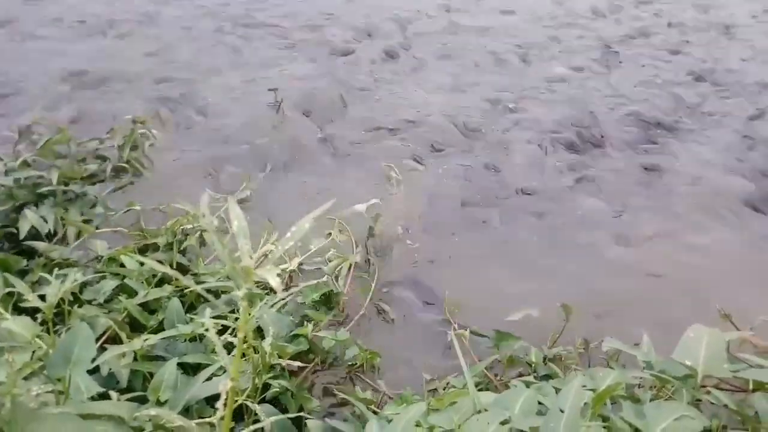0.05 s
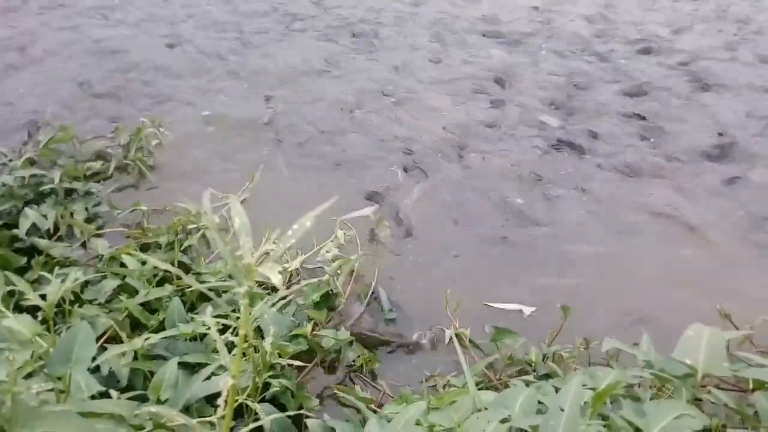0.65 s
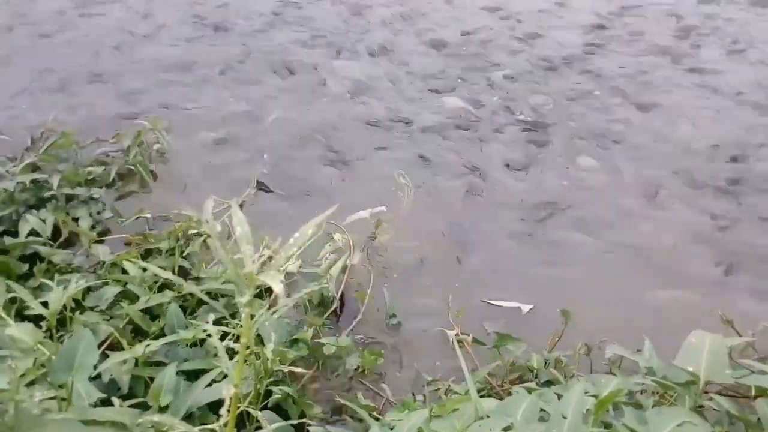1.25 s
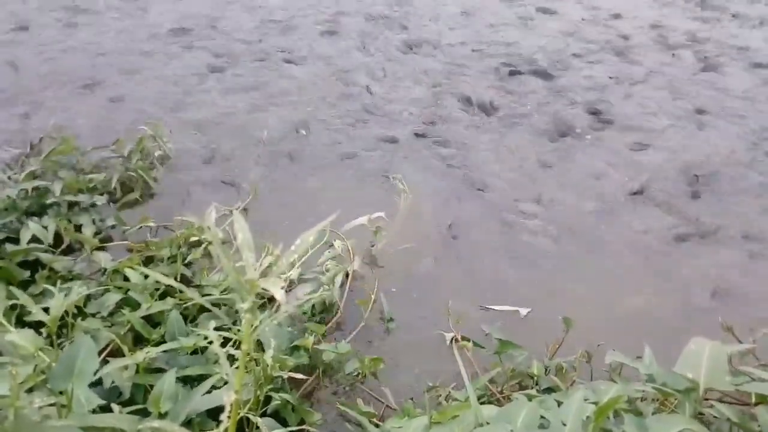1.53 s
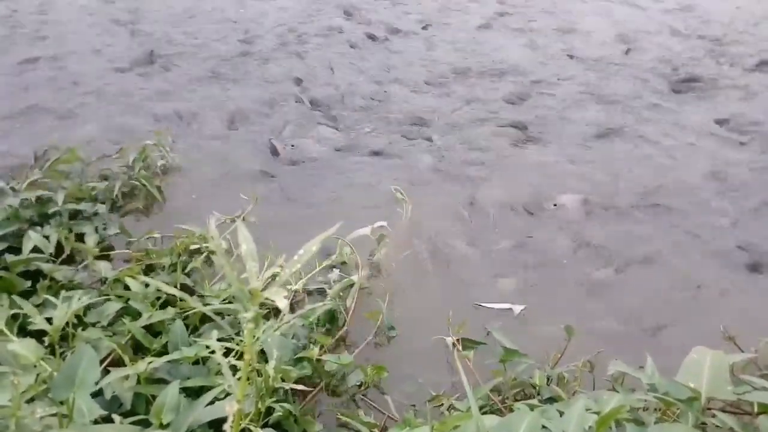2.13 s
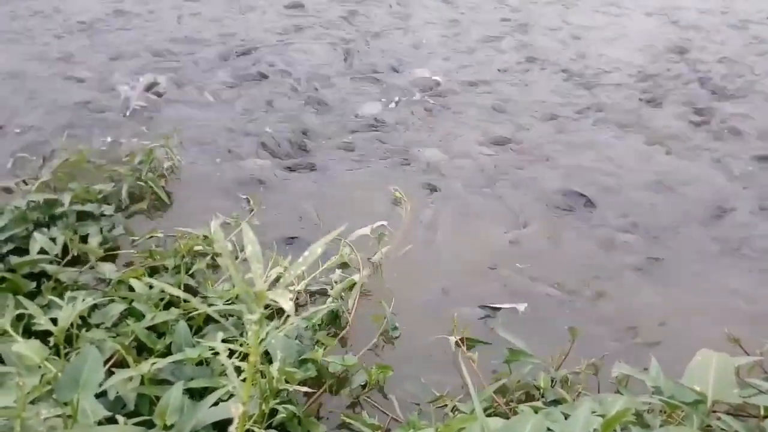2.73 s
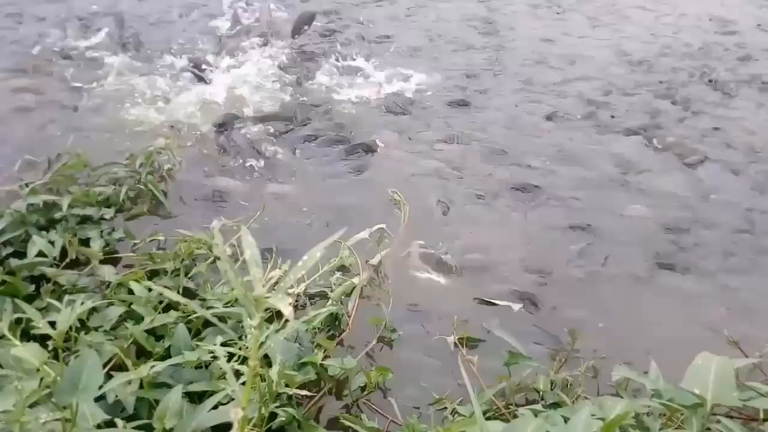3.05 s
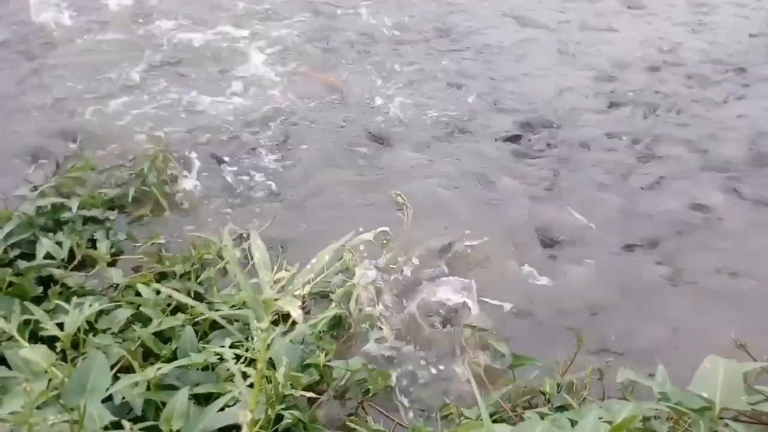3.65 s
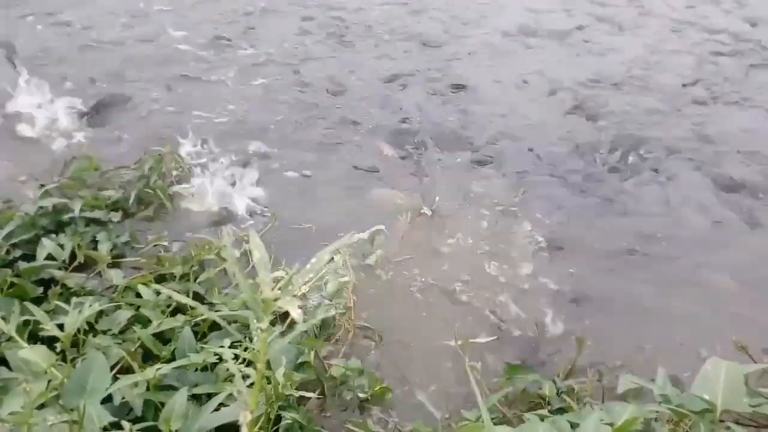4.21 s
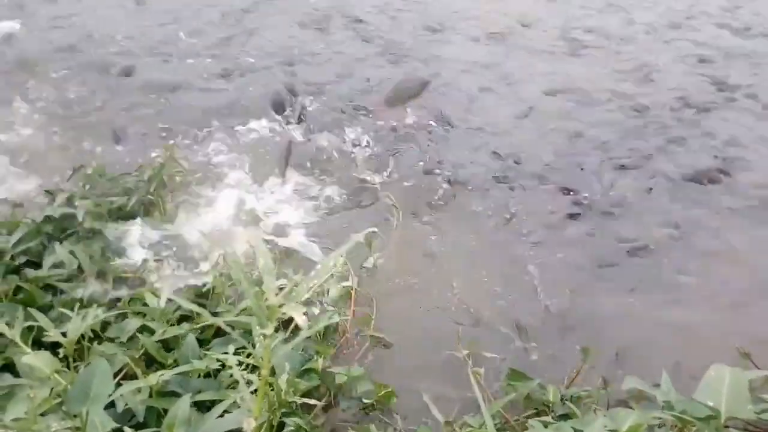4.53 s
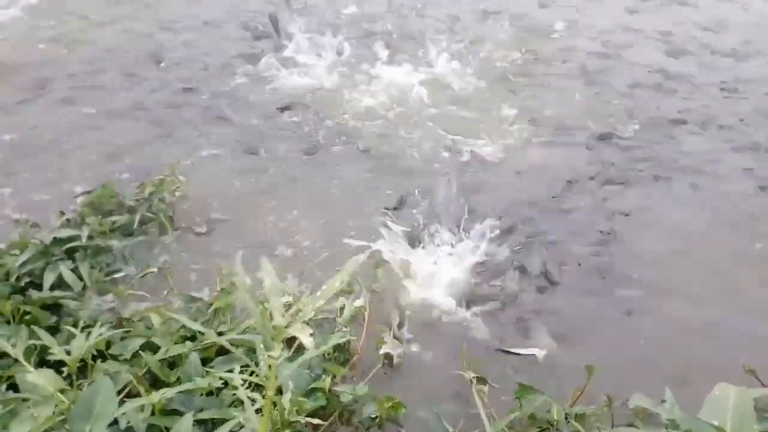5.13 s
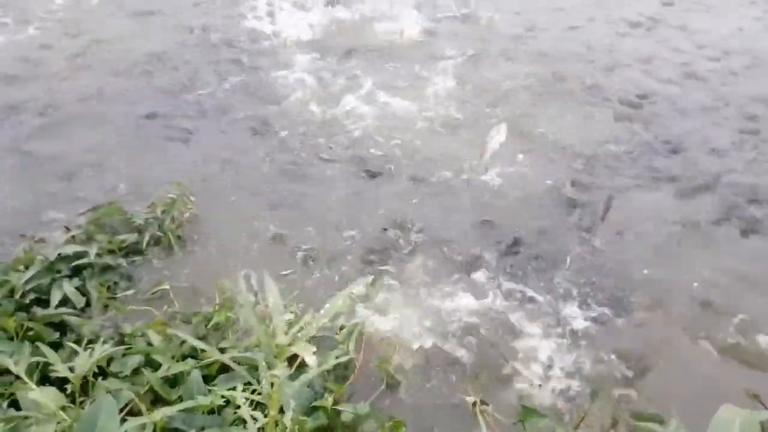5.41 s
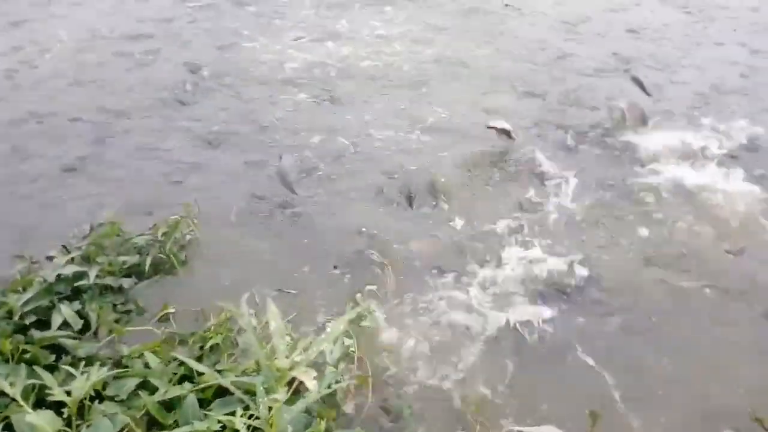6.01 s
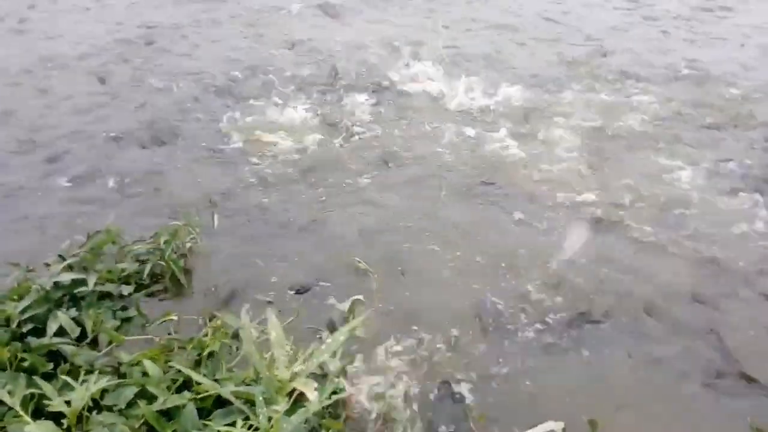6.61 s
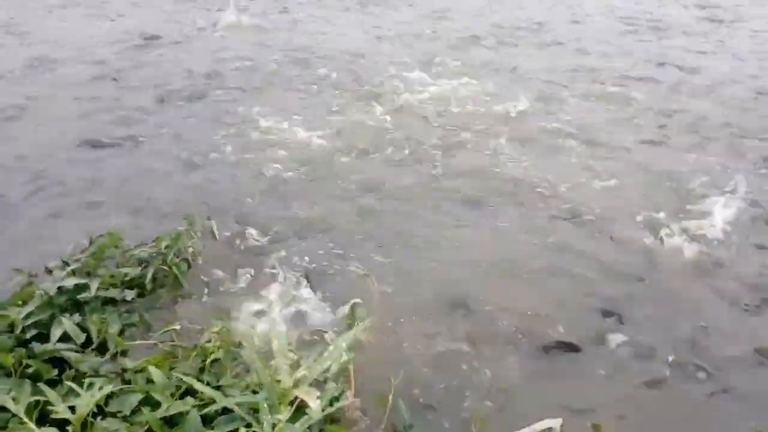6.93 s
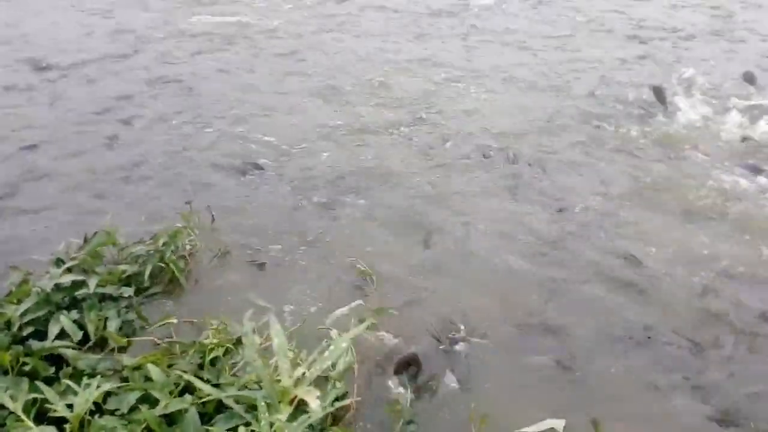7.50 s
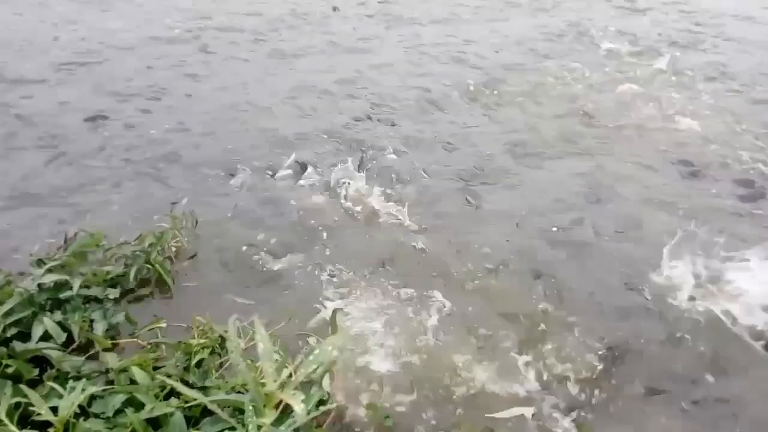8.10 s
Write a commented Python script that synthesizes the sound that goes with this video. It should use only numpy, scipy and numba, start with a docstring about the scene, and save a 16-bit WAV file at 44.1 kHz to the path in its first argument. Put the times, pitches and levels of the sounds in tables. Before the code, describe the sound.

From the start, many fish feed quietly at the surface of a pond: small plops that slide upward in pitch, soft gulps, ticking drops and a fine trickle. The bubbling is busier around 0.5 and 1.3 seconds, dips near 2.3, then picks up briefly. At about 2.8 seconds the fish suddenly thrash, and the sound becomes much louder. Short splashes overlap several times a second, each mixing a deep plunge, churning bubbles and hissing spray that rains back. Clear single plops and sharp drips stand out among them. The splashing is strongest from about 4.2 to 6.6 seconds, eases slightly around 7, and surges again near 7.8, continuing until the end just past 8 seconds. A faint, uneven outdoor rumble lies underneath. Everything is heard close by from the bank, almost wholly in the right channel, with only a thin trace and faint hiss on the left.

```python
"""At the bank of a pond, in the open air, a crowd of fish feeds at the surface.
Their mouths make bubbles that plop and gulp, and drops tick on the water. Then the fish panic
and thrash: tails plunge, clouds of bubbles ring and spray rains back.
Each bubble is a short tone that slides upward. Nearly all the sound is in the right channel."""
import sys
import numpy as np
from scipy import signal
from scipy.fft import rfft, irfft
from scipy.io import wavfile
from scipy.ndimage import uniform_filter1d
from numba import njit

SR = 44100
rng = np.random.default_rng(int(sys.argv[2]) if len(sys.argv) > 2 else 0)


def log_audio(samples):
    """Write samples as a 16-bit WAV file to the path given in sys.argv[1]."""
    # one column per channel
    frames = np.atleast_2d(samples).T
    # limit to full scale, then quantise
    limited = np.clip(frames, -1, 1)
    pcm = np.round(limited * 32767).astype(np.int16)
    wavfile.write(sys.argv[1], SR, pcm)


N = 368676

# A "colour" says how strong each pitch is. Deep plunges, churned water, fine spray: f/Hz, level/dB
PLUNGE_COLOUR = [(40, -6), (85, -24.5), (130, -15.5), (210, -1.5), (320, 0.5), (400, 1), (460, -8.5),
                 (650, -44), (1500, -63)]
CHURN_COLOUR = [(250, -57.5), (450, -11.5), (530, -7.5), (640, -4), (780, -4), (920, -2), (1060, -6),
                (1220, 0.5), (1400, -1.5), (1750, -5), (2150, -5.5), (2600, -13), (3600, -9), (8000, -75)]
SPRAY_COLOUR = [(900, -40), (2000, 1.5), (2800, -0.5), (4300, -2), (6700, -1.5), (7300, -10.5),
                (8100, -15.5), (10500, -14.5), (13500, -22), (15000, -13)]
# Bouts of tail beating: t/s, length/s, churn level/dB, plunge over churn/dB, spray over churn/dB
SPLASHES = [(2.809, 0.037, -47.5, -6, -4.5), (2.848, 0.23, -34, -14, -14), (3.05, 0.025, -41.5, -14, -1.5),
            (3.153, 0.26, -38, -17, -10), (3.447, 0.064, -38.5, -20, -14.5), (3.578, 0.12, -36, -15.5, -7),
            (3.723, 0.18, -39.5, -30, -5), (3.857, 0.023, -45.5, -60, 0.5), (4.197, 0.21, -32, -13, -9.5),
            (4.456, 0.25, -33, -14, -9), (4.802, 0.14, -34, -15.5, -10), (5.054, 0.073, -32, -13.5, -12),
            (5.139, 0.04, -29.5, -12.5, -7.5), (5.253, 0.28, -37, -17.5, -7.5),
            (5.586, 0.039, -35, -12.5, -9), (5.743, 0.18, -34, -16, -8), (5.985, 0.07, -38, -11, -4.5),
            (6.137, 0.063, -31, -20, -10.5), (6.25, 0.27, -36, -14, -13), (6.43, 0.17, -35, -16, -8),
            (6.815, 0.11, -45, -39, -5.5), (6.902, 0.19, -39.5, -11.5, -8.5), (7.03, 0.17, -41.5, -12, -5),
            (7.22, 0.021, -41, -29, -13), (7.345, 0.046, -41.5, -20, -10), (7.391, 0.14, -37.5, -15, -10.5),
            (7.577, 0.14, -37.5, -10, -11), (7.801, 0.09, -32.5, -11, -6.5), (8.07, 0.089, -34.5, -15, -8),
            (8.197, 0.057, -34, -19.5, -11.5)]


def thrashing(plunge_db=5, churn_db=2.5, gurgle_db=0.77, spray_db=3.5, mist_db=0.2, tick_db=-5):
    """Tails push big pockets of air under, whip the surface into bubbles and fling spray."""
    starts, lengths, churn_levels, plunge_over, spray_over = np.transpose(SPLASHES)
    plunge = cloud(PLUNGE_COLOUR, 80, 520, per_s=300, cycles=10, spread_db=2.2, rise=.25)
    churn = cloud(CHURN_COLOUR, 509.6, 2855, per_s=2200, cycles=9, spread_db=3.0, rise=0.22)
    gurgle = cloud(CHURN_COLOUR, 520, 2400, per_s=170, cycles=28, spread_db=2.5, rise=.35)
    droplets = cloud(SPRAY_COLOUR, 1940, 13800, per_s=6000, cycles=22, spread_db=5.0, rise=0.14)
    spray = (gain_of(spray_db) * droplets + gain_of(mist_db) * mist()) * surges(per_s=110, depth_db=3.0)
    spray += gain_of(tick_db) * ticking(per_s=70, spread_db=2.5)  # larger drops land one by one
    deep = gain_of(plunge_db) * plunge
    froth = gain_of(churn_db) * churn + gain_of(gurgle_db) * gurgle
    water = deep * splash_gain(starts, lengths, churn_levels + plunge_over, lag_s=0.00092, rain_db=-10)
    water += froth * splash_gain(starts, lengths, churn_levels, lag_s=0.00067, rain_db=-9)
    water += spray * splash_gain(starts, lengths, churn_levels + spray_over, lag_s=-0.012, rain_db=-3.5)
    return water * surges(per_s=80, depth_db=0.56)


def splash_gain(starts, lengths, levels_db, lag_s, rain_db):
    """Each splash builds, holds while the tail beats, then settles; thrown water rains on for longer."""
    build_s, settle_db_per_s, rain_db_per_s = 0.049, 68, 21.5
    t = np.arange(0, N, 64) / SR
    power = np.zeros(len(t))
    for start, length, db in zip(starts, lengths, levels_db):
        age = t - start - lag_s
        after = np.maximum(age - length, 0)
        building = gain_of(db) * np.clip(age / build_s, 0, 1)
        settling = gain_of(-settle_db_per_s * after)
        raining = gain_of(rain_db - rain_db_per_s * after)
        power += building ** 2 * (settling ** 2 + raining ** 2)
    return np.interp(np.arange(N) / SR, t, np.sqrt(power))


# Clear single bubbles pinched off by mouths and tails: t/s, level/dB, f/Hz
PLOPS = [(0.1921, -32, 2880), (0.3966, -21.5, 1750), (0.4257, -24, 970), (0.43, -26.5, 1990),
         (0.4668, -25, 1350), (0.47, -35, 3800), (0.513, -38, 3350), (0.519, -31, 2350),
         (0.544, -26.5, 830), (0.6036, -34.5, 1130), (1.0475, -26, 1830), (1.1241, -29.5, 2250),
         (1.2504, -32, 1250), (1.2938, -29, 830), (1.56, -30, 1480), (1.6023, -35, 1260),
         (1.6612, -35, 1730), (1.705, -34, 1590), (1.903, -37.5, 2150), (1.9878, -31, 1480),
         (2.1393, -32.5, 960), (2.3387, -32.5, 1490), (2.411, -41, 3250), (2.4718, -33.5, 1230),
         (2.5324, -25.5, 1550), (2.6116, -22, 1670), (2.7475, -34, 2830), (3.026, -13.5, 702),
         (3.594, -18.5, 835), (3.6503, -9.5, 580), (3.685, -11.5, 1620), (3.757, -15.5, 775),
         (3.938, -18.5, 1140), (4.1603, -22.5, 1730), (4.207, -20, 1710), (4.2821, -11.5, 740),
         (4.714, -9.5, 1294), (5.0534, -14, 2060), (5.1716, -10.5, 730), (5.1865, -9, 630),
         (5.235, -15, 1170), (5.387, -13, 800), (6.038, -16, 945), (6.064, -22, 1250), (6.176, -17, 1390),
         (6.382, -20, 1130), (6.4601, -10, 900), (6.4964, -12, 550), (6.563, -12.5, 520),
         (6.7669, -19, 1930), (6.8584, -17, 2900), (6.9781, -20, 566), (7.4659, -16.5, 940),
         (7.4844, -15.5, 1520), (7.9472, -14.5, 673), (8.0714, -15.5, 1790)]
# The splutter of a bubble's skin breaking: f/Hz, level/dB
SPLUTTER_COLOUR = [(150, -10), (700, 3), (2000, 3), (4000, -7), (15000, -22)]
# A bubble at the surface gives off little bass: f/Hz, level/dB
SURFACE_COLOUR = [(50, -44), (200, -2), (430, -11), (560, -1.5), (6700, 0.5), (8100, 3)]


def plops(ring_s=0.017, rise=0.12, splutter_db=-20, splutter_s=0.099, small_db=-16, small_count=3):
    """Each bubble rings; its skin breaks with a splutter and leaves a few smaller bubbles."""
    rings, splutter = np.zeros(N), np.zeros(N)
    t = np.arange(SR // 10) / SR
    for start, db, hz in PLOPS:
        add(rings, start, gain_of(db) * bubble(hz * (1 - rise / 5), ring_s, rise))
        add(splutter, start, gain_of(db) * rng.standard_normal(len(t)) * fade(t, splutter_s))
        for delay, smallness in rng.random((small_count, 2)):
            small = bubble(hz * (1.062 + 1.157 * smallness), 26 / hz, rise)
            add(rings, start + 0.0035 + .05 * delay, gain_of(db + small_db) * small)
    return coloured(rings + gain_of(splutter_db) * coloured(splutter, SPLUTTER_COLOUR), SURFACE_COLOUR)


# Pockets of air on their way up: t/s, level/dB, starting f/Hz, length/s
GULPS = [(0.246, -40, 650, 0.063), (.285, -33, 181.6, 0.093), (0.327, -34, 850, 0.035),
         (0.34, -27.5, 634, 0.032), (0.453, -36, 309, 0.057), (0.544, -34.5, 377, 0.032),
         (0.653, -39, 1000, 0.025), (0.752, -44, 617, 0.056), (0.882, -45, 810, .045),
         (1.299, -34, 748, 0.043), (1.389, -37, 260, 0.1), (1.792, -38.5, 388, 0.041),
         (2.077, -33, 555, 0.038), (2.326, -37, 1170, 0.047), (4.481, -15.5, 597, 0.021),
         (5.781, -24.5, 371, 0.038), (5.943, -15.5, 678, 0.014), (7.157, -19, 617, 0.02),
         (7.9, -15, 540, 0.018), (8.299, -34.5, 225.6, 0.13)]


def gulps(trim_db=-2, fade_db=13, octaves_per_s=12.7):
    """An air pocket rings with a wobbling loudness; its pitch climbs as it nears the surface."""
    out = np.zeros(N)
    for start, db, first_hz, length in GULPS:
        t = np.arange(int(length * SR)) / SR
        turns = np.cumsum(first_hz * 2 ** (octaves_per_s * t)) / SR
        loudness = gain_of(db - fade_db * t / length) * signal.windows.tukey(len(t), .25)
        add(out, start, loudness * np.sin(2 * np.pi * turns))
    return gain_of(trim_db) * out * surges(per_s=130, depth_db=2.0)


# Drops that hit the water close by: t/s, level/dB
DRIPS = [(0.241, -29.5), (0.2571, -25.5), (0.3973, -36), (0.4668, -43), (0.788, -34), (0.9766, -32),
         (1.177, -32), (1.2428, -31.5), (1.3243, -26.5), (1.661, -35), (2.7474, -33), (3.7776, -32),
         (4.0595, -38), (4.3837, -20), (5.109, -17), (5.4297, -17.5), (5.8823, -14.5), (6.1761, -17.5),
         (6.448, -20), (6.8837, -18.5), (6.978, -22), (7.25, -29)]
# A full, sharp crack, with the treble dulled above 7 kHz: f/Hz, level/dB
DRIP_COLOUR = [(150, -4.5), (700, 6.5), (2000, 9), (6700, 2.5), (8100, -12), (15000, -20)]


def drips(trim_db=2, fade_s=0.019):
    """A drop hits the surface with a short, sharp crack."""
    out, t = np.zeros(N), np.arange(SR // 20) / SR
    for start, db in DRIPS:
        crack = coloured(rng.standard_normal(len(t)) * fade(t, fade_s), DRIP_COLOUR)
        add(out, start, gain_of(db) * crack / abs(crack).max())
    return gain_of(trim_db) * out


# How busily the fish feed before the panic: t/s, level/dB
FEEDING_LEVELS = [(0.0, -59.5), (0.5, -54.5), (0.85, -61), (1.3, -52.5), (1.6, -58), (2.1, -60.5),
                  (2.36, -70.5), (2.58, -51), (2.81, -62.5)]


def feeding(lap_db=2.5, chirp_db=3.0, droplet_db=7.0, mist_db=-5):
    """Many mouths farther out make small bubbles, longer rising chirps and a fine trickle."""
    times, busy_db = np.transpose(FEEDING_LEVELS)
    lap = cloud(CHURN_COLOUR, 517, 2760, per_s=220, cycles=24, spread_db=4.5, rise=0.5)
    chirps = cloud(CHURN_COLOUR, 620, 2300, per_s=45, cycles=65, spread_db=2.5, rise=.8)
    droplets = cloud(SPRAY_COLOUR, 1740, 8150, per_s=600, cycles=26, spread_db=4.5, rise=0.24)
    bubbles = gain_of(lap_db) * lap + gain_of(chirp_db) * chirps
    trickle = gain_of(droplet_db) * droplets + gain_of(mist_db) * mist() + ticking()
    trickle_db = -64 + 0.93 * (busy_db - busy_db.mean())  # swings a little less than the bubbles
    return bubbles * level_curve(times, busy_db) + trickle * level_curve(times, trickle_db)


# Bright, thin ticks of tiny drops, with the treble dulled above 7 kHz: f/Hz, level/dB
THIN_TICKS = [(500, -20), (2500, 0), (6700, 0), (8100, -9), (15000, -10)]


def ticking(per_s=200, spread_db=2.0, tick_s=.0005):
    """Drops flicked up by the fish land as faint, short crackles."""
    sizes = gain_of(spread_db * np.minimum(rng.exponential(1, N), 4))
    landings = sizes * (rng.random(N) < per_s / SR)
    bursts = signal.lfilter([1], [1, -np.exp(-1 / (tick_s * SR))], landings)  # each one dies away
    return gain_of(-4) * evened(coloured(bursts * rng.standard_normal(N), THIN_TICKS))


def mist():
    """Countless tiny droplets blend into a smooth hiss."""
    return evened(coloured(rng.standard_normal(N), SPRAY_COLOUR))


def bank_echo(sound, echo_db=-13, fade_s=0.23):
    """Leaves and the bank scatter the sound back as a short tail of echoes."""
    t = np.arange(SR // 3) / SR
    echoes = rng.standard_normal(len(t)) * (rng.random(len(t)) < .1) * (t > .002)
    tail = echoes * fade(t, fade_s)
    return sound + gain_of(echo_db) * signal.oaconvolve(sound, tail / np.linalg.norm(tail))[:N]


# The low outdoor background: f/Hz, level/dB
AIR_COLOUR = [(25, -7), (50, -10), (85, 1), (180, 2.5), (300, -2.5), (450, -4), (800, -20), (1400, 1),
              (2700, -14), (4000, -10), (6700, -16.5), (8200, -20.5), (13000, -24), (15000, -24)]


def air(level_db=-56.5):
    """A low, uneven outdoor rumble lies under everything."""
    rumble = evened(coloured(rng.standard_normal(N), AIR_COLOUR))
    return gain_of(level_db) * rumble * surges(per_s=34, depth_db=3.5)


def cloud(colour, low_hz, high_hz, per_s, cycles, spread_db, rise):
    """Bubbles of many sizes appear at random moments, most faint and a few strong."""
    dice = np.random.default_rng(rng.integers(2 ** 30))
    when, strength, smallness, life, glide = dice.random((int(per_s * N / SR), 5)).T
    hz = low_hz * (high_hz / low_hz) ** smallness
    gains = np.sqrt(hz) * gain_of(spread_db * np.minimum(-np.log(1 - strength), 3.5))
    fades_s = cycles * 2 ** (2 * life - 1) / hz  # small bubbles die sooner
    return evened(coloured(ringing(when * N / SR, gains, hz, fades_s, 2 * rise * glide, N, SR), colour))


def bubble(hz, fade_s, rise):
    """One ringing bubble, scaled so its peak is 1."""
    pitches, fades_s, rises = (np.full(1, float(value)) for value in (hz, fade_s, rise))
    ring = ringing(np.zeros(1), np.ones(1), pitches, fades_s, rises, int(fade_s * SR) + 2, SR)
    return ring / abs(ring).max()


@njit
def ringing(starts, gains, pitches, fades_s, rises, length, sr):
    """Each bubble is a tone that swells quickly, then dies away; a rise of 0.1 ends it 10% higher."""
    out = np.zeros(length)
    for k in range(len(starts)):
        first = int(starts[k] * sr)
        for i in range(min(int(fades_s[k] * sr), length - first)):
            turns, age = pitches[k] * i / sr, i / sr / fades_s[k]
            swell = turns * turns / (turns * turns + .25)
            tone = np.sin(2 * np.pi * turns * (1 + rises[k] * age / 2))
            out[first + i] += gains[k] * swell * np.exp(-6.9 * age) * tone
    return out


def gain_of(db):
    """Turns decibels into a number to multiply by."""
    return 10 ** (np.asarray(db) / 20)


def fade(t, fade_s):
    """Dies away by 60 dB in fade_s seconds."""
    return np.exp(-np.log(1000) * t / fade_s)


def evened(sound):
    """Scales a sound so its average power is 1."""
    return sound / np.sqrt(np.mean(sound ** 2) + 1e-20)


def add(mix, start_s, sound):
    """Mixes a sound in at the given time."""
    part = mix[max(round(start_s * SR), 0):][:len(sound)]
    part += sound[:len(part)]


def coloured(sound, colour, size=4096):
    """Makes each pitch louder or softer, as a colour table says."""
    hz, db = np.transpose(colour)
    log_hz = np.log(np.fft.rfftfreq(size, 1 / SR) + 1)
    cepstrum = irfft(np.log(gain_of(np.interp(log_hz, np.log(hz), db))))
    cepstrum[1:size // 2] *= 2  # folded so the filter rings only after a sound, never before
    cepstrum[size // 2 + 1:] = 0
    return signal.oaconvolve(sound, irfft(np.exp(rfft(cepstrum))))[:len(sound)]


def level_curve(times, db):
    """Loudness that follows the given points, silent before and after them."""
    t = np.arange(N) / SR
    playing = 1. * ((t >= times[0]) & (t <= times[-1] + .03))
    return gain_of(np.interp(t, times, db)) * uniform_filter1d(playing, size=600)


def surges(per_s, depth_db):
    """Loudness that swells and sinks at random."""
    points = np.clip(rng.standard_normal(4000), -2, 2)
    wander = np.interp(np.arange(N) / SR * per_s, np.arange(len(points)), points)
    return evened(gain_of(depth_db * wander))


# The colours of the faint trace of the pond and of the steady hiss, both on the left: f/Hz, level/dB
TRACE_COLOUR = [(60, -30), (200, -44), (700, -42), (1300, -41), (2400, -33), (4400, -25), (8000, -20),
                (15000, -20)]
HISS_COLOUR = [(45, -9), (130, -5), (330, -1), (1000, 0), (4000, -1), (6500, -3), (8500, -12.5),
               (15000, -14)]


def scene():
    """The pond is on the right; the left has only a thin, blurred trace of it and hiss."""
    pond = bank_echo(plops() + gulps() + drips() + feeding() + thrashing()) + air()
    trace = gain_of(-16) * coloured(bank_echo(pond, echo_db=15, fade_s=0.076), TRACE_COLOUR)
    hiss = gain_of(-66.5) * evened(coloured(rng.standard_normal(N), HISS_COLOUR))
    return np.array([trace + hiss, pond])


def record(dry):
    """Cuts away the very highest treble."""
    top_hz = 15800
    treble_cut = signal.firwin(511, top_hz, window=("kaiser", 9), fs=SR)
    return signal.oaconvolve(dry, treble_cut[None], "same")


dry = scene()
out = record(dry)
log_audio(out)
```